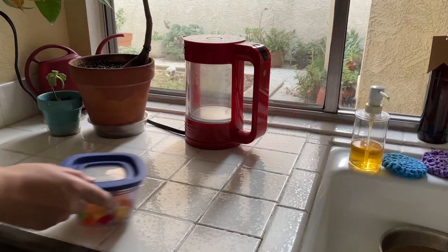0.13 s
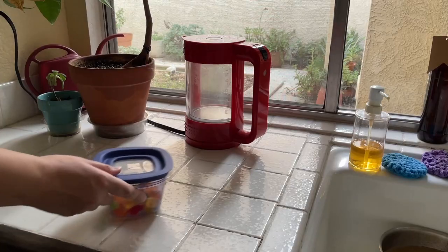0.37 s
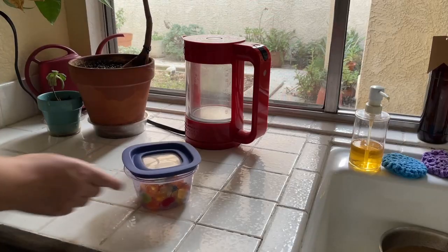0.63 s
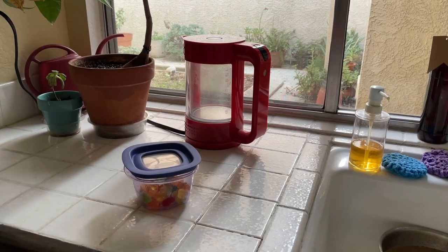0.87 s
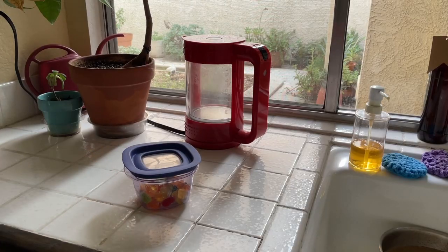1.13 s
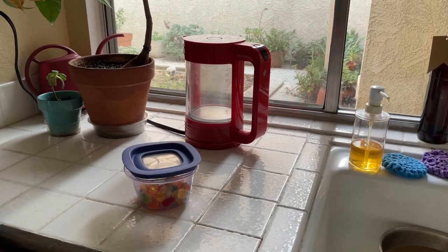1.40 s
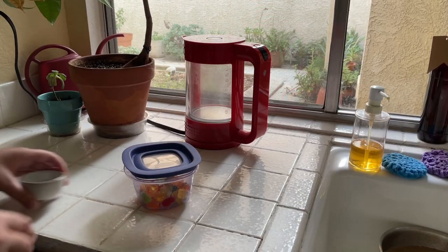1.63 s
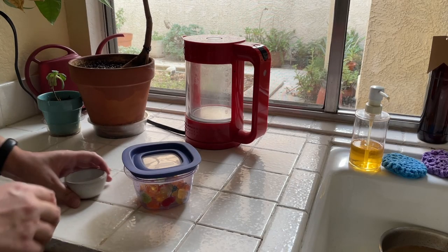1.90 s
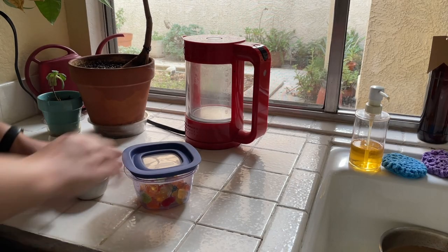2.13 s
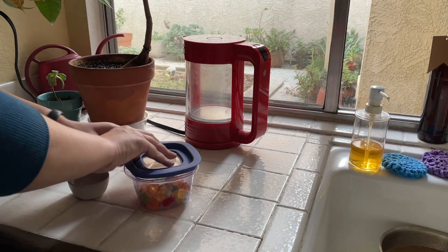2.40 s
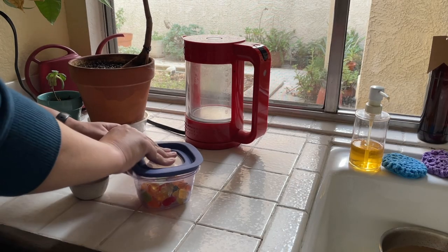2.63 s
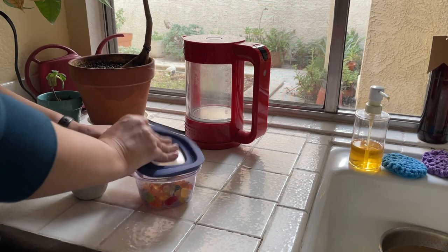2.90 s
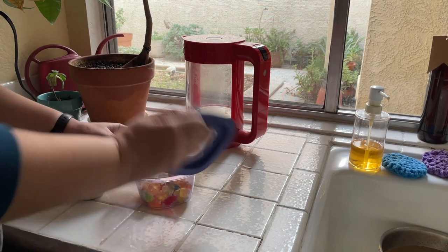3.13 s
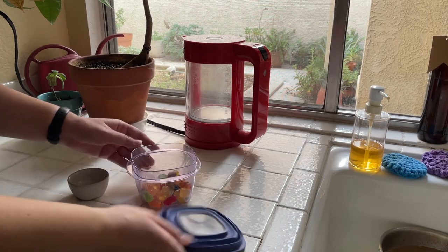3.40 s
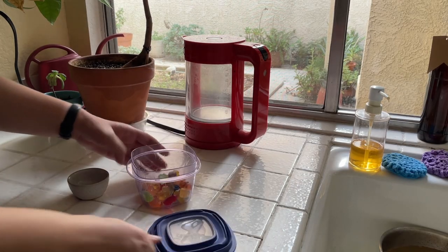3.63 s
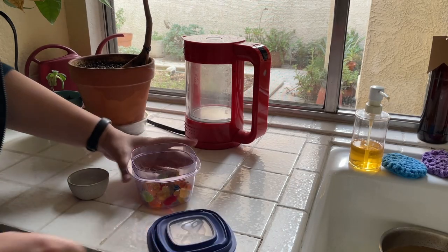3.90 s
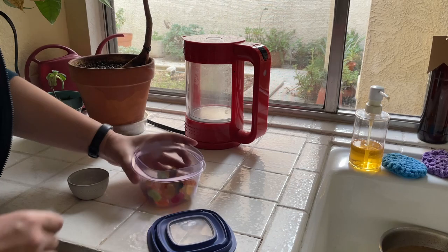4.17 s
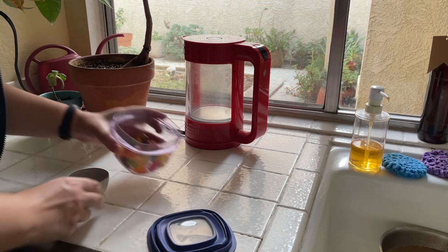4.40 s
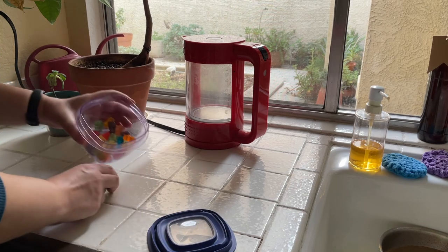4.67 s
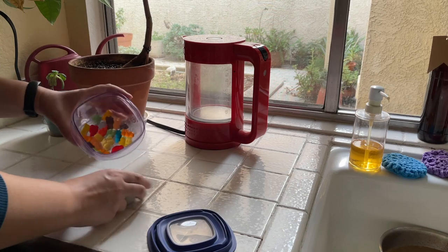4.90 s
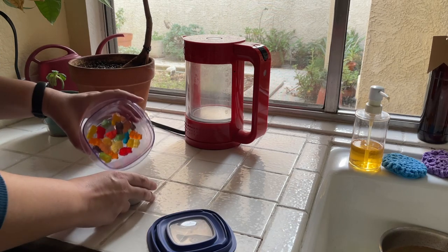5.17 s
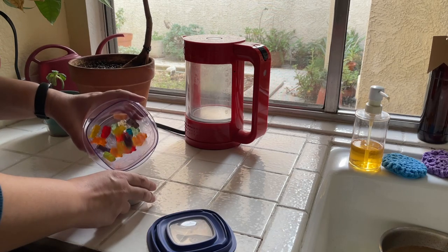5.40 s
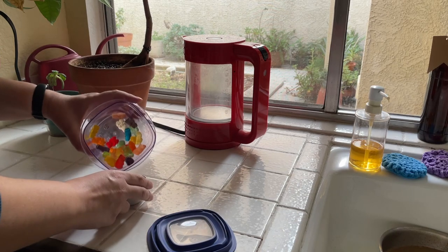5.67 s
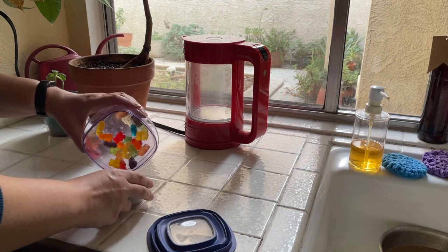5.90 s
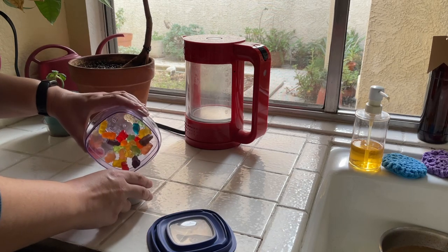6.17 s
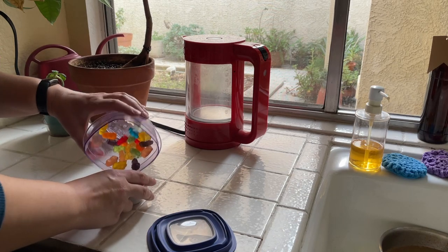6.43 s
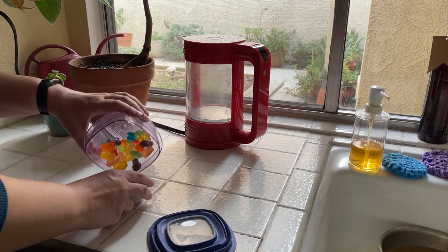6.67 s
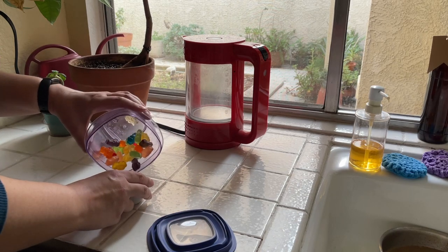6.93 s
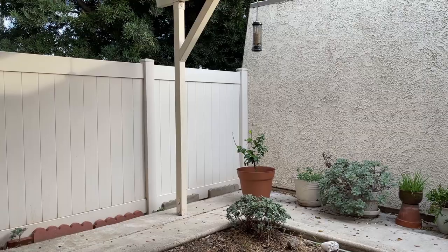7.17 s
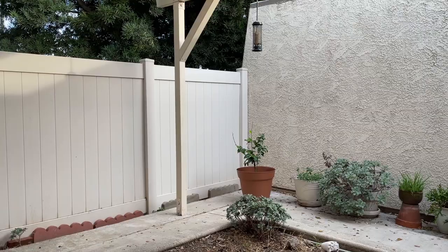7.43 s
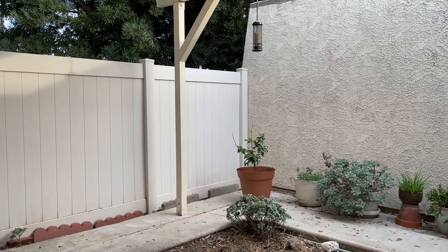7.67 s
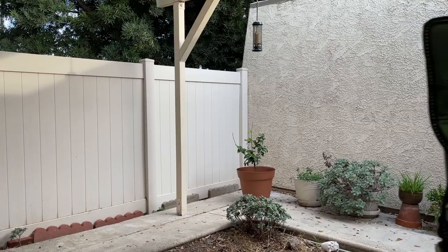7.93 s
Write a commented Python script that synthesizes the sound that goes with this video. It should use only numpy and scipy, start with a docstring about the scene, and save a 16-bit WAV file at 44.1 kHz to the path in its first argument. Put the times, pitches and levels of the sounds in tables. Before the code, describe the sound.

Close kitchen handling: plastic knocks, bowl chatter, lid pop and clatter, soft sweets pattering in a tub; then yard hum with snapping stiff cloth.

```python
"""Sweets tub and bowl, then a yard

A lidded plastic tub and a small ceramic bowl are set down on kitchen tiles; the lid is prised off and laid down,
and soft sweets tumble in the tilted tub. Then a hard cut to a yard: far traffic, a hum and stiff fabric.
Impacts and friction excite damped modes answered by the room; backgrounds are filtered noise, the hum a gliding sine.
The mix goes to the left channel only."""
import sys
import numpy as np
from scipy import signal
from scipy.fft import rfft, irfft, next_fast_len
from scipy.io import wavfile
from scipy.ndimage import uniform_filter1d

SR = 44100
rng = np.random.default_rng(int(sys.argv[2]) if len(sys.argv) > 2 else 0)


def generate_wav(signal):
    """Clip the signal to [-1, 1] and save it as 16-bit WAV at the path in sys.argv[1]."""
    frames = np.transpose(np.atleast_2d(signal))
    scaled = np.clip(frames, -1, 1) * 32767
    pcm = np.round(scaled).astype(np.int16)
    wavfile.write(sys.argv[1], SR, pcm)


def decibels_to_gain(level_db):
    """Convert a level in decibels to a linear amplitude gain (20 dB per decade)."""
    exponent = np.asarray(level_db, float) / 20
    return 10 ** exponent


N = 355181

# All level_db columns are relative to the mix before scene() doubles it.


# Modes of the open tub: hz [Hz], width_hz [Hz], level_db [dB]
OPEN_TUB_MODES = [(264, 86, 7), (379.6, 80, 8), (785.5, 200.7, 0), (1058.8, 130.3, -3), (1191.8, 166, -3),
                  (1887, 519, 6.5), (2316.5, 177, 1), (2667, 533, 4), (3953, 1200, 5), (4726, 2900, -13),
                  (5250, 2930, -4), (9050, 910, -18.5)]
# Thin dry ticks, as of a sticky sweet or fingertip letting go: start_s [s], level_db [dB]
TICKS = [(4.204, -44.5), (5.457, -39.5), (5.48, -35), (5.496, -38), (5.557, -34.5), (5.679, -43),
         (5.867, -29.5), (6.719, -33)]
# Their colour: thud, 1.6-5 kHz, above 5 kHz [dB over 600-1600 Hz]
TICK_COLOUR = [-54.5, -1, -4.5]
# The loudest sweets in the sliding heap: start_s [s], level_db [dB]
TUMBLES = [(4.734, -48.5), (4.755, -32.5), (4.798, -30), (4.818, -24.5), (4.875, -29.5), (4.927, -37)]
# Their colour: thud, 1.6-5 kHz, above 5 kHz [dB over 600-1600 Hz]
TUMBLE_COLOUR = [-13, 7.1, -28]
# Single sweets drop on the tub's wall: start_s [s], level_db [dB], high_db at 1.6-5 kHz [dB over 600-1600 Hz]
DROPS = [(3.985, -65, 15), (5.871, -25, 3.5), (5.922, -19.5, 5), (6.09, -41.5, -5), (6.117, -27, -11.5),
         (6.385, -40, -27.5), (6.47, -30.5, -9.5), (6.49, -24.5, -3.5), (6.597, -34.5, -4),
         (6.633, -38, -31), (6.722, -30.5, -5.5), (6.787, -41, -5), (6.824, -34.5, -14),
         (6.862, -34.5, -13), (6.973, -46, -25), (7.076, -51.5, -32)]
# The heap slides, the last few trickle after:
# start_s [s], attack_s [s], hold_s [s], release_s [s per 30 dB], level_db [dB]
POUR_STROKES = [(4.65, 0.1903, 0.1306, 0.0016, -43), (4.98, 0.0407, 0.045, 0.01, -54.5)]


def sweets():
    """Modal excitation: ticks, tumbles and soft drops ring the open tub, over the granular flow of the heap."""
    ticks = [(*row, *TICK_COLOUR) for row in TICKS]
    tumbles = [(*row, *TUMBLE_COLOUR) for row in TUMBLES]
    sharp = knocks(ticks + tumbles, OPEN_TUB_MODES, scuff=0.0444, scuff_s=0.0074, room_db=-7)
    thud_db, top_db = -7.5, -50
    drops = [(s, db, thud_db, high, top_db) for s, db, high in DROPS]
    soft = knocks(drops, OPEN_TUB_MODES, scuff=0.176, scuff_s=0.00388, room_db=-5)
    flow = strokes(POUR_STROKES)
    pour = friction(flow, 800, OPEN_TUB_MODES, [-4.5, 4.0, 2.5, -17.5], room_db=-2.0)
    pour_hiss = decibels_to_gain(-19) * flow * hiss(patchy_db=-3.0)
    return sharp + soft + pour + pour_hiss


# Slides of the open tub: start_s [s], attack_s [s], hold_s [s], release_s [s per 30 dB], level_db [dB]
OPEN_SLIDES = [(3.94, 0.0402, 0.1003, 0.064, -61.5), (4.12, 0.078, 0.0078, .07, -64.5)]


def open_tub_drag():
    """Sliding friction: dense small impacts drive the modes of the open tub."""
    return friction(strokes(OPEN_SLIDES), 700, OPEN_TUB_MODES, [1.5, -3.5, -3.0, -7.5], room_db=-10.0)


# Modes of the lid: hz [Hz], width_hz [Hz], level_db [dB]
LID_MODES = [(277, 175, 0), (403, 170, 8.5), (541, 128, -3.5), (702, 254.6, 5), (1132, 166, -5),
             (2030, 975, 3), (3270, 262, -11), (3830, 598, -4.5), (7560, 3320, 1.5), (10675, 9300, -1.5)]
# The lid is gripped, prised and pops off:
# start_s [s], level_db [dB], thud_db below 600 Hz, top_db above 5 kHz [dB over 600-1600 Hz]
LID_KNOCKS = [(2.43, -42, 13, -15.5), (2.562, -67, 20, -23), (2.701, -56, 3.5, 6.5), (2.745, -55, 5, -13.5),
              (2.825, -23.5, 8, -6.5), (2.867, -34.5, -31, -16), (2.943, -44.5, 9, -22),
              (2.974, -42, 3, -29.5), (2.996, -38.5, 4.5, -39), (3.095, -43, -28.5, -21.5),
              (3.119, -52, -5.5, 5), (3.191, -44.5, 8.5, -29.5), (3.239, -52, -25.5, -19)]
# The lid's edge meets the tiles: columns as for LID_KNOCKS
LID_LANDINGS = [(3.353, -27, -0.5, 6.5), (3.384, -42, -12.5, 9), (3.473, -39, 6, -6),
                (3.52, -32.5, -16.5, -2.5), (3.55, -16.5, -5.5, -46.5)]
# The seal groans before the pop: start_s [s], attack_s [s], hold_s [s], release_s [s per 30 dB], level_db [dB]
CREAK_STROKES = [(2.75, 0.0946, .025, .01, -56)]


def lid():
    """Modal excitation: blows, and friction at the seal, set the thin lid ringing."""
    held_high_db, landing_high_db = -1, 4.5  # 1.6-5 kHz over the middle band
    held = [(s, db, thud, held_high_db, top) for s, db, thud, top in LID_KNOCKS]
    landing = [(s, db, thud, landing_high_db, top) for s, db, thud, top in LID_LANDINGS]
    blows = knocks(held + landing, LID_MODES, scuff=0.1033, scuff_s=0.0046, room_db=-7)
    return blows + friction(strokes(CREAK_STROKES), 720, LID_MODES, [-0.5, -12, -24, -40], room_db=-21)


# The counter gives a dull thump under the lid: start_s [s], level_db [dB]
THUMPS = [(3.353, -49), (3.549, -48.5)]


def thumps():
    """Heavily damped resonance: a low push that dies within a few cycles."""
    hz, decay_s = 150, 0.012
    out = np.zeros(N)
    for s, db in THUMPS:
        t = np.clip(np.arange(N) / SR - s, 0, 1)
        out += decibels_to_gain(db) * np.sin(2 * np.pi * hz * t) * np.exp(-t / decay_s)
    return out


# Modes of the bowl: hz [Hz], width_hz [Hz], level_db [dB]
BOWL_MODES = [(329.3, 79.8, 0), (730, 110, 1.5), (1233, 320, 8), (1986, 429.9, 7), (2353, 427, 6.5),
              (2625, 420, 6), (3647.8, 666, 6), (4180, 570, -11), (5930, 1100, -3), (8972, 510, -18.5)]
# The bowl lands, chatters and rocks once more:
# start_s [s], level_db [dB], high_db at 1.6-5 kHz [dB over 600-1600 Hz]
BOWL_KNOCKS = [(1.932, -26.5, 26), (1.946, -19.5, 8), (1.9667, -18, 12), (1.969, -21, 10.5),
               (1.974, -24.5, 5), (1.977, -24, 8), (2.074, -24.5, -1), (2.087, -26.5, 13.5),
               (2.111, -26, -5)]


def bowl():
    """Modal excitation by hard contact: brighter blows also carry more energy above 5 kHz."""
    thud_db = -17
    rows = [(s, db, thud_db, high, -51.5 + 0.68 * high) for s, db, high in BOWL_KNOCKS]
    return knocks(rows, BOWL_MODES, scuff=.03, scuff_s=.003, room_db=-4)


# The bowl's rim is set ringing: start_s [s], level_db [dB]
RIM_RINGS = [(1.934, -39), (2.087, -48), (4.818, -52), (4.93, -60), (5.92, -50.5), (6.1163, -78.5),
             (6.487, -70), (6.814, -75)]
# The rim's one mode: hz [Hz], width_hz [Hz]
RIM_MODE = (4540, 9)


def rim():
    """Lightly damped resonance: the bowl's one clear note, woken by blows on it or beside it."""
    blows, t = np.zeros(N), np.arange(SR // 3) / SR
    for s, db in RIM_RINGS:
        blows[round(s * SR)] = decibels_to_gain(db)
    hz, width_hz = RIM_MODE
    decay = np.exp(-np.pi * width_hz * t)
    rise = 1 - np.exp(-t / 0.0032)
    return signal.fftconvolve(blows, np.sin(2 * np.pi * hz * t) * decay * rise)[:N]


# Modes of the shut tub: hz [Hz], width_hz [Hz], level_db [dB]
SHUT_TUB_MODES = [(211, 144, 1), (329, 33.7, -1), (354.4, 37, -9.5), (462, 193, -10), (795, 118, -1),
                  (1240, 260, -3.5), (1692.4, 320, -3), (2140, 250, -6), (3120, 1180, 1.5), (3871, 310, -3),
                  (5830, 330, -4.5), (9000, 2300, -3.5)]
# The shut tub meets the tiles: start_s [s], level_db [dB], thud_db below 600 Hz [dB over 600-1600 Hz]
TUB_KNOCKS = [(0.323, -35, 17.5), (0.49, -37, -6.5), (0.506, -45, 11.5), (0.515, -41.5, 13.5),
              (1.444, -43.5, -8), (1.46, -44, -20), (1.487, -51, -6)]
# The tub's base drags on the tiles, then settles:
# start_s [s], attack_s [s], hold_s [s], release_s [s per 30 dB], level_db [dB]
SHUT_SLIDES = [(0.33, 0.19, 0.0274, 0.062, -49.5), (0.62, 0.092, 0.056, 0.122, -72.5)]


def shut_tub():
    """Modal excitation: blows and sliding friction on the tiles drive the same plastic shell."""
    high_db, top_db = 5.5, -10.5  # 1.6-5 kHz and above 5 kHz, over the middle band
    rows = [(*row, high_db, top_db) for row in TUB_KNOCKS]
    blows = knocks(rows, SHUT_TUB_MODES, scuff=0.056, scuff_s=0.0056, room_db=-5.5)
    return blows + friction(strokes(SHUT_SLIDES), 750, SHUT_TUB_MODES, [2.5, -8, 0.5, -9.5], room_db=-2)


def counter():
    """Radiation efficiency: small things on the tiles radiate no deep bass; the counter's thumps keep theirs."""
    bass_cut = signal.butter(3, 200, "high", fs=SR, output="sos")
    handled = sweets() + open_tub_drag() + lid() + bowl() + rim() + shut_tub()
    return signal.sosfilt(bass_cut, handled) + thumps()


# Snaps of cloth: start_s [s], level_db [dB], pitch_hz of the fold [Hz]
SNAPS = [(1.828, -45, 8200), (7.2713, -53.5, 8000), (7.281, -52.5, 9000), (7.3199, -49.5, 9500),
         (7.3613, -43.5, 9500), (7.502, -40, 7500), (7.5098, -36.5, 6630), (7.6404, -44, 11800),
         (7.6467, -44, 5800), (7.6811, -41, 11900), (7.6994, -37, 5800), (7.7, -36.5, 11800),
         (7.72, -40, 11800), (7.7277, -41, 11800), (7.8078, -33.5, 6440), (7.8274, -46.5, 11000),
         (7.876, -41.5, 7200), (7.891, -35.5, 7495), (7.9368, -30, 7790), (7.954, -29.5, 7300),
         (8.002, -50.5, 11000), (8.0444, -48, 5800)]
# Folds that flex in each snap: hz [Hz], length_s [s]
CREASES = [(5800, 0.000474), (8700, 0.00046), (11800, 0.00033)]
# Fine crackle of the cloth: start_s [s], level_db [dB]
RUSTLE = [(7.14, -58), (7.2, -71), (7.37, -83), (7.45, -97.5), (7.51, -57), (7.58, -65.5), (7.71, -67.5),
          (7.78, -70.5), (8.05, -68.5)]


def fabric():
    """Buckling of stiff cloth: bright snaps, each with a swishing after-hiss, over finer crackle."""
    out, t = np.zeros(N + SR), np.arange(SR // 10) / SR
    fall_db = 20  # per octave away from a snap's pitch
    for s, db, pitch_hz in SNAPS:
        burst = 0.0519 * rng.standard_normal(len(t)) * np.exp(-t / 0.0096)
        burst[0] = 1
        folds = np.zeros(64)
        for hz, length_s in CREASES:
            folds += decibels_to_gain(db - fall_db * abs(np.log2(hz / pitch_hz))) * crease(hz, length_s)
        out[round(s * SR):][:len(t)] += np.convolve(burst, folds)[:len(t)]
    fine_fold = crease(8800, 0.00017) + 1.84 * crease(2990, 0.00054)
    crackle = unit(np.convolve(grains(6000, spread_db=1.5), fine_fold)[:N])
    return out[:N] + level(RUSTLE) * crackle


def crease(hz, length_s):
    """Windowed oscillation: a fold of cloth flexes briefly."""
    t = np.arange(64) / SR
    return np.sin(2 * np.pi * hz * t) * np.sin(np.pi * np.clip(t / length_s, 0, 1)) ** 2


# Spectrum of far traffic: hz [Hz], density_db [dB per Hz]
TRAFFIC_SPECTRUM = [(12, -20.5), (20, 9.5), (46, -3.5), (101, -7.5), (158, -10.5), (347, -11), (574, -12.5),
                    (759, -10), (2260, -25), (3840, -26), (5380, -38), (6180, -34), (10500, -41),
                    (16000, -56.5)]
# Low machine hum: start_s [s], pitch_hz [Hz], level_db [dB]
HUM = [(7.139, 150, -58.5), (7.4, 148.2, -60.5), (7.7, 150.9, -62.5), (7.9, 152.5, -69.5),
       (8.05, 157.3, -82.5)]


def yard():
    """Filtered noise and phase integration: far traffic, and a low machine hum of gliding pitch."""
    s, hz, _ = np.transpose(HUM)
    pitch_hz = np.interp(np.arange(N) / SR, s, hz)
    hum = np.sin(2 * np.pi * np.cumsum(pitch_hz) / SR)
    return decibels_to_gain(-54) * noise(TRAFFIC_SPECTRUM, patchy_db=-1.39) + level(HUM, column=2) * unit(hum)


# Spectrum of the bright hiss: hz [Hz], density_db [dB per Hz]
HISS_SPECTRUM = [(88, -32.5), (150, -0.5), (348, -7.5), (431, 0), (457, -7), (578, -3), (1060, -6.5),
                 (4240, -8), (5360, -14), (11000, -21.5), (16000, -49)]


def hiss(patchy_db):
    """Filtered noise: the hiss of the kitchen, which also colours the pour."""
    return noise(HISS_SPECTRUM, patchy_db)


# Spectrum of still room and microphone noise: hz [Hz], density_db [dB per Hz]
QUIET_SPECTRUM = [(26, -33), (45, -3.5), (48, -12.5), (70, -2), (150, -13), (207, -40), (264, -10),
                  (488, -29), (4800, -34.5), (16000, -30)]
# Level of the kitchen hiss: start_s [s], level_db [dB]
HISS_LEVEL = [(0, -77), (0.55, -70.5), (0.75, -75), (1.05, -72), (1.2, -67), (1.62, -70), (1.8, -70),
              (2.3, -74), (4.6, -73), (5.2, -82), (5.7, -76), (6.3, -82.5), (7.13, -83)]
# Brief swells of the deep rumble: start_s of the crest [s], level_db [dB]
RUMBLE_SWELLS = [(1.16, -55), (1.501, -50), (1.75, -54), (2.2, -56), (2.35, -56)]


def room_tone():
    """Superposed noise: a steady hush, a deep rumble that swells briefly, and a brighter hiss of varying level."""
    t = np.arange(N) / SR
    swell_s = 0.0598  # from the crest to 1/e
    rumble_gain = decibels_to_gain(-68) + sum(decibels_to_gain(db) * np.exp(-((t - s) / swell_s) ** 2) for s, db in RUMBLE_SWELLS)
    rumble_spectrum = [(3, -4.5), (10, 0.5), (30, -20.5), (70, -25.5), (200, -93.5)]  # (Hz, dB per Hz)
    rumble = rumble_gain * noise(rumble_spectrum, patchy_db=4.0)
    hush = decibels_to_gain(-77) * noise(QUIET_SPECTRUM, patchy_db=-0.39)
    return hush + rumble + level(HISS_LEVEL) * hiss(patchy_db=2.0)


# Borders between the low, middle, high and top bands: hz [Hz]
BAND_EDGES_HZ = [600, 1600, 5000]


def ring(modes, band_db, draw):
    """Modal superposition: the blow sets the strength of each band, the grip shifts each mode by chance."""
    hz, width_hz, db = np.transpose(modes)
    band = np.digitize(hz, BAND_EDGES_HZ)
    gain = decibels_to_gain(db + 1.5 * draw[0])
    band_norm = np.sqrt(np.bincount(band, gain ** 2))
    gain = gain / band_norm[band] * decibels_to_gain(np.asarray(band_db)[band])
    # neighbours in opposite sense leave no holes; low twins start together
    flips = (np.diff(np.log(hz), prepend=0) > .16) | (band > 0)
    gain = gain * (-1.) ** np.cumsum(flips)
    t = np.arange(SR // 6)[:, None] / SR
    hz = hz + .2 * width_hz * draw[1]
    rise = 1 - np.exp(-t * hz / 0.27)  # a contact takes part of a cycle to build up
    decay = np.exp(-np.pi * np.abs(width_hz) * t)
    return (rise * np.sin(2 * np.pi * hz * t) * decay) @ gain


def knocks(rows, modes, scuff, scuff_s, room_db):
    """Source-filter principle: a sharp blow and short scuff drive the modes; the room hears the modes' ring."""
    out, t = np.zeros(N + SR), np.arange(SR // 20) / SR
    for (s, db, low, high, top), tail in zip(rows, kitchen(count=len(rows))):
        force = scuff * rng.standard_normal(len(t)) * np.exp(-t / scuff_s)
        force[0] = 1
        body = ring(modes, [low, 0, high, top], rng.standard_normal((2, len(modes))))
        direct = signal.fftconvolve(force / np.linalg.norm(force), body)
        sound = decibels_to_gain(room_db) * signal.fftconvolve(body, tail)
        sound[:len(direct)] += direct
        out[round(s * SR):][:len(sound)] += decibels_to_gain(db) * sound
    return out[:N]


def friction(gain, rate, modes, band_db, room_db):
    """Stochastic excitation: a stream of small impacts drives an object's modes and the room."""
    body = ring(modes, band_db, np.zeros(2))
    impacts = gain * grains(rate, spread_db=3.0)
    direct = signal.fftconvolve(impacts, body / np.linalg.norm(body))[:N]
    return direct + decibels_to_gain(room_db) * signal.fftconvolve(direct, kitchen(count=1)[0])[:N]


def grains(rate, spread_db):
    """Random point process: tiny impacts (rate per second), a few much stronger than the rest; rms 1."""
    size = decibels_to_gain(spread_db * np.minimum(rng.exponential(size=N), 4.5))
    size = size * rng.choice([-1, 1], N)
    return unit(size * (rng.random(N) < rate / SR))


def strokes(rows):
    """Amplitude envelope: each stroke climbs 30 dB, holds, and falls away."""
    gain = np.zeros(N)
    for s, attack_s, hold_s, release_s, db in rows:
        t = np.arange(N) / SR - s
        climb_db = 30 * np.clip(1 - t / attack_s, 0, 1) ** 2
        fall_db = 30 * np.clip(t - attack_s - hold_s, 0, 1) / release_s
        gain += (t > 0) * decibels_to_gain(db - climb_db - fall_db)
    return gain


# Decay of the kitchen: hz [Hz], t60_s [s]
KITCHEN_DECAY = [(200, 0.34), (1000, 0.4234), (4000, 0.365), (10000, 0.11)]


def kitchen(count):
    """Reverberation: decaying noise of energy 1, in which each frequency dies at its own speed."""
    hz, t, z = signal.stft(rng.standard_normal((count, SR // 2)), SR, nperseg=256)
    decay = decibels_to_gain(-60 * t / along(KITCHEN_DECAY, hz)[:, None])
    tails = signal.istft(z * decay, SR, nperseg=256)[1]
    t = np.arange(tails.shape[1]) / SR
    tails = tails * (1 - np.exp(-t / 0.00572))  # the first walls are a few ms away
    tails = tails * (1 + 3 * np.exp(-t / .012))  # tiles and window answer first and strongest
    return tails / np.linalg.norm(tails, axis=1, keepdims=True)


def noise(spectrum, patchy_db):
    """Spectral shaping: coloured noise of rms 1, with patches of random gain in time and frequency."""
    z = signal.stft(rng.standard_normal(N + 512), nperseg=512)[2]
    field = uniform_filter1d(rng.standard_normal(z.shape), 6, 0)
    field = uniform_filter1d(field, 12, 1)
    x = signal.istft(z * decibels_to_gain(patchy_db * unit(field)), nperseg=512)[1][:N]
    m = next_fast_len(N + 8192)
    colour = decibels_to_gain(along(spectrum, np.fft.rfftfreq(m, 1 / SR)))
    return unit(irfft(rfft(x, m) * colour, m)[:N])


def level(rows, column=1):
    """Logarithmic loudness: gain per sample from a dB curve, practically silent outside it."""
    rows = np.array(rows)
    return decibels_to_gain(np.interp(np.arange(N) / SR, rows[:, 0], rows[:, column], -150, -150))


def along(points, hz):
    """Logarithmic frequency scale: (Hz, value) points interpolated on a log axis."""
    f, v = np.transpose(points)
    return np.interp(np.log(hz + 1), np.log(f + 1), v)


def unit(x):
    """Normalisation by mean power: scaled to rms 1."""
    return x / np.sqrt(np.mean(x ** 2) + 1e-20)


def scene():
    """Superposition: the kitchen, a hard cut to the yard, and fabric over both; all on the left."""
    outside = np.clip((np.arange(N) / SR - 7.135) / 0.0013, 0, 1)
    mix = (1 - outside) * (counter() + room_tone()) + outside * yard() + fabric()
    return np.array([2 * mix, 0 * mix])


def band_limit(x):
    """A steep low-pass at the top of the band."""
    return signal.sosfilt(signal.butter(12, 16520, fs=SR, output="sos"), x)


def record(dry):
    """Signal chain: the finished mix goes through its last stage."""
    return band_limit(dry)


dry = scene()
out = record(dry)
generate_wav(out)
```